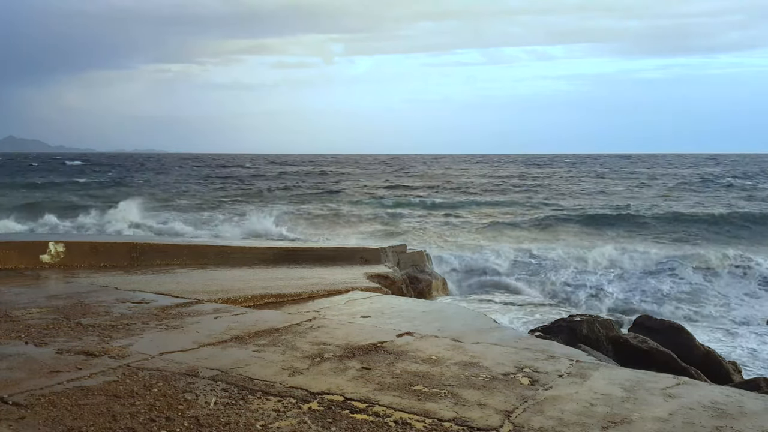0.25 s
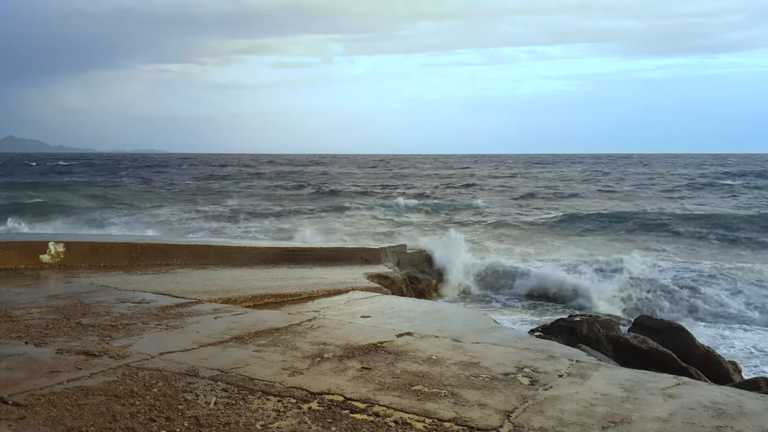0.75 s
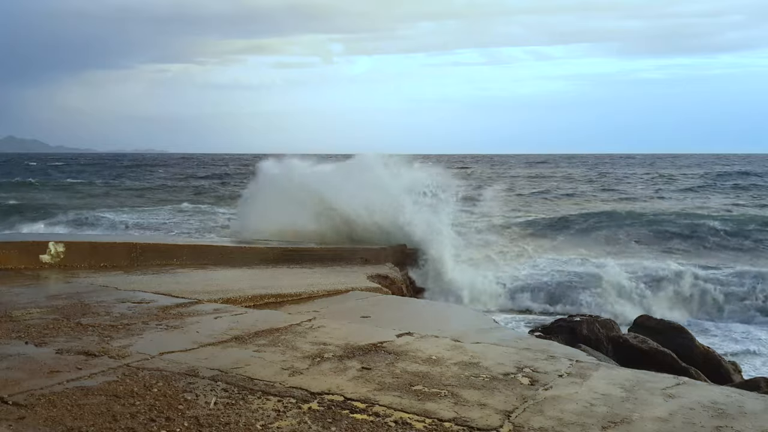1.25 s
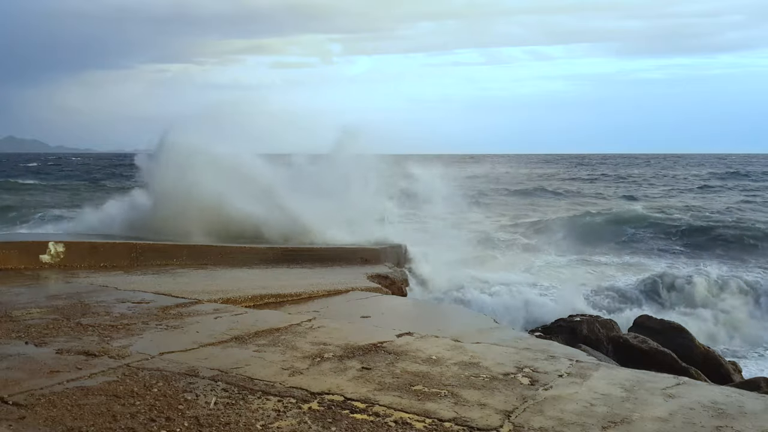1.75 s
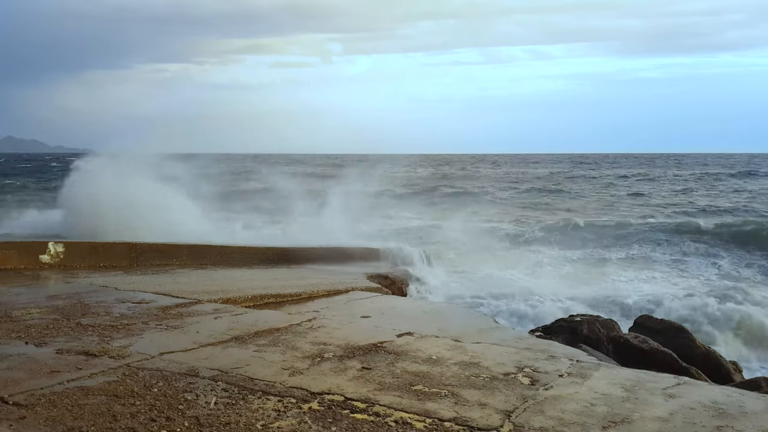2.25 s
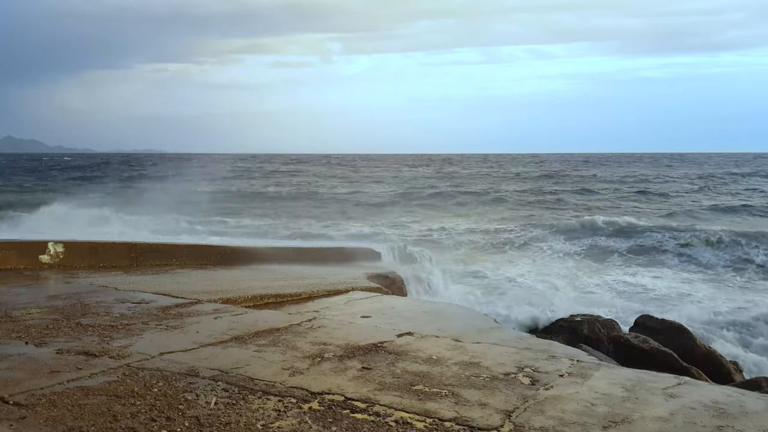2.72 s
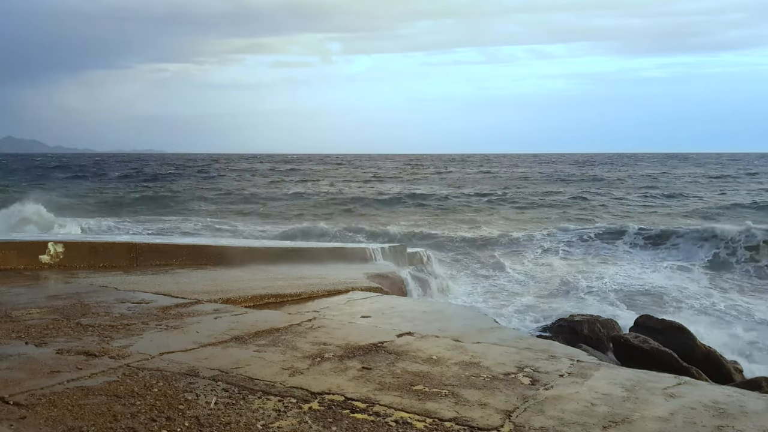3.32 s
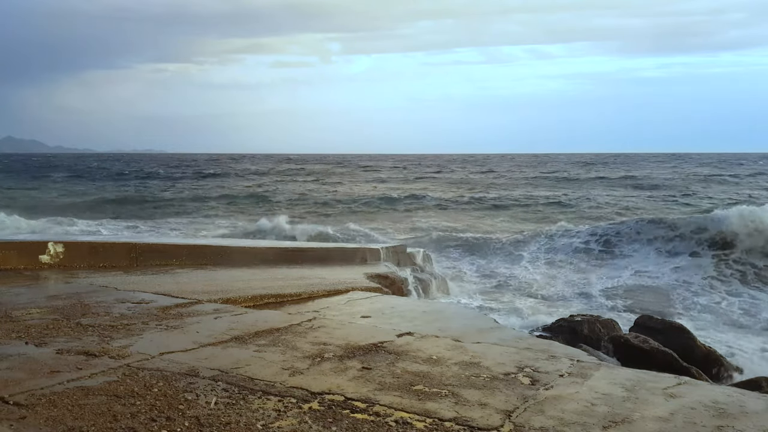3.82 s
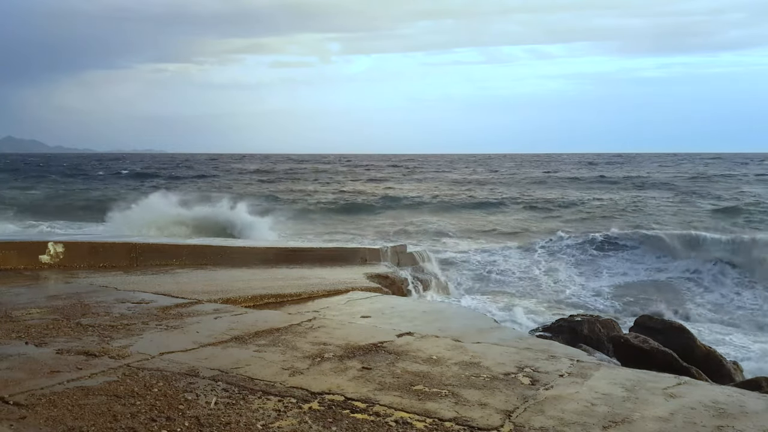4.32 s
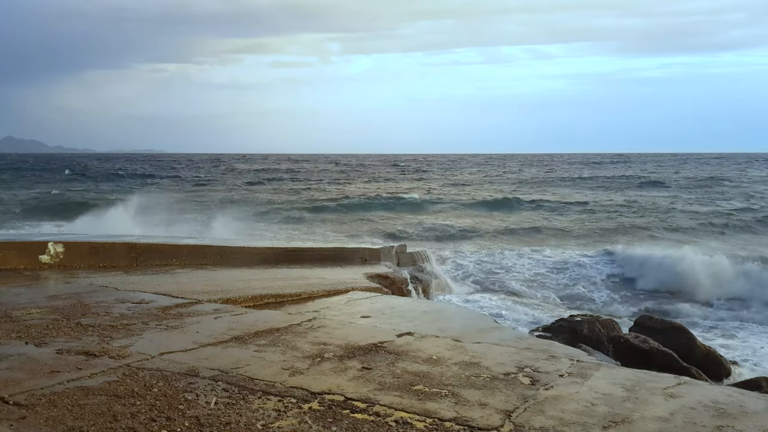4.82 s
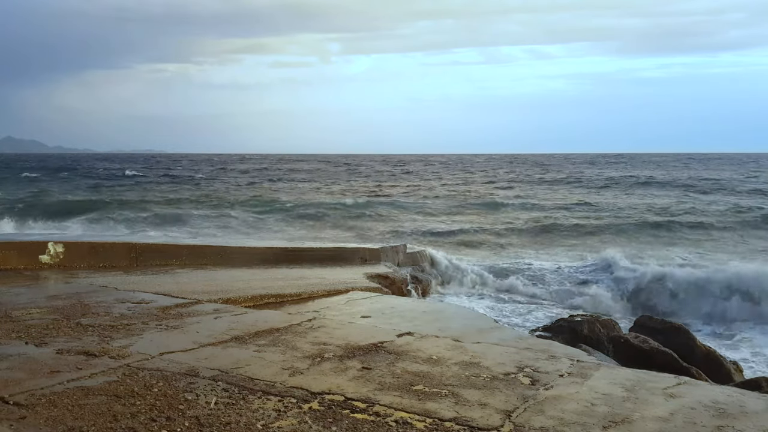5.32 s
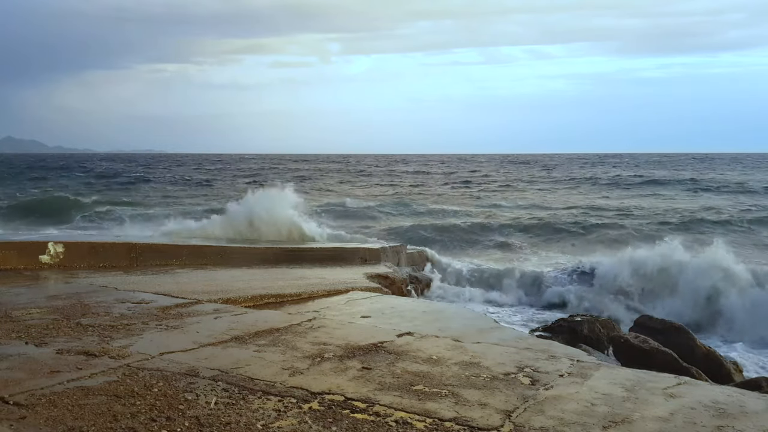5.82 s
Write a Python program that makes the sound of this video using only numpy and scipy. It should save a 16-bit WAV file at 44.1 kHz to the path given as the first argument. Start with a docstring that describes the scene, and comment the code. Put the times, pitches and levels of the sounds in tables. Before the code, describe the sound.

Rough waves break on a jetty and rocks with a wide foamy wash, two big surges, and a crackling gust of wind midway.

```python
"""A rocky coast with a jetty in storm surf, heard through two spaced microphone ports.
Waves roar on the rocks to the right, burst on the jetty ahead and fall back as spray: shaped noise plus
ringing bubbles, one band per pocket or droplet size. Gusts flutter as lumpy noise unrelated at the two ports,
pop as short pressure jolts on one port, and thud as slower ones on both; one pair of jolts is only faint chance
flecks of noise. The camera's steep wind filter leaves only their upper part; the spectra already carry it."""
import sys
import numpy as np
from scipy import signal
from scipy.fft import rfft, irfft, next_fast_len
from scipy.io import wavfile
from scipy.ndimage import uniform_filter1d, map_coordinates

SR = 44100
rng = np.random.default_rng(int(sys.argv[2]) if len(sys.argv) > 2 else 0)


def int16_out(signal):
    """Quantize to a 16-bit WAV file."""
    q = np.round(np.clip(np.atleast_2d(signal).T, -1, 1) * 32767)
    wavfile.write(sys.argv[1], SR, q.astype(np.int16))


N = 267246

# Surf strength: time_s, foam_db, then relative to foam: spray_db, crash_db, roar_db
SURF_LEVELS = [(0, -50, -12, 2.5, 3.5), (.46, -51, -14.5, 1, 3.5), (.6, -48.5, -11.5, 3.5, 4.5),
               (.85, -44.5, -13.5, 0, 1), (1.07, -44, -11.5, 1.5, 4), (1.15, -42.5, -13, -2, 3),
               (1.4, -43, -12.5, 1, 0.5), (1.65, -41.5, -14.5, 0, 0.5), (1.72, -39.5, -13, 1, 1.5),
               (1.78, -37, -12, 2, 0), (1.87, -35.5, -13, 0, -0.5), (1.94, -36, -12, 1, -5.5),
               (2.05, -37, -13.5, -1, -3.5), (2.16, -35, -10.5, -2.5, -2), (2.3, -39, -9, -0.5, -5),
               (2.45, -39.5, -10.5, 1, 1), (2.62, -42.5, -9, -5, 0.5), (2.8, -45.5, -9.5, -1.5, 0.5),
               (3, -44.5, -10.5, -1.5, 2.5), (3.15, -47, -10, -1.5, 3), (3.62, -48, -13.5, -1, 3.5),
               (3.88, -43.5, -15.5, -0.5, 3), (4, -45, -14, -1, 3.5), (4.15, -42, -16.5, -3, 1.5),
               (4.3, -37.5, -16, -1.5, 2), (4.45, -39.5, -15, -0.5, 3), (4.6, -41, -18.5, -1.5, 3.5),
               (4.72, -41, -16, -1, 5.5), (4.85, -40, -14, -1, 5.5), (4.95, -38.5, -14.5, -1.5, 5.5),
               (5.05, -37.5, -13.5, -1, 4.5), (5.17, -37.5, -14, 1.5, 2.5), (5.25, -36, -15, -4.5, 3.5),
               (5.31, -39, -14.5, -1.5, 3.5), (5.42, -42, -12, -2, 2.5), (5.6, -41.5, -14, 0.5, 2.5),
               (5.8, -40.5, -13, -2.5, 2.5), (6.06, -36, -13.5, -1.5, 2)]
# Brief dips of roar, crash, foam and spray: time_s, depth_db
SURF_DIPS = [(2.68, 4), (3.05, 3), (5.62, 4)]
DIP_SIDE_S = 0.016  # to 1/e of the depth, each side
# Gain of the roar's deep part: time_s, gain_db
ROAR_DEEP_GAIN = [(0, -0.5), (.5, 3), (.9, -2.2), (1.3, 0.5), (1.65, 2), (1.85, 0), (2.1, 4.5), (2.7, 0.5),
                  (3.3, -1.5), (3.9, -0.5), (4.2, -1.7), (4.5, 2), (4.8, -2.5), (5.1, -4.5), (5.25, -0.8),
                  (5.6, -0.5), (6.06, -1.2)]
ROAR_DEEP_HZ = 875
# Water power arriving from the jetty instead of the rocks: time_s, share_0_to_1
JETTY_SHARE = [(0, .3), (.55, .3), (.7, .65), (1.3, .55), (1.6, .5), (2.2, .55), (2.6, .08), (6.06, .08)]
# Wave booming against the jetty wall: time_s, level_db
BOOM_LEVELS = [(0, -77), (.28, -61), (.35, -52), (.47, -61), (.55, -56.5), (.8, -66), (1.1, -57.5),
               (1.4, -56), (1.8, -54), (2.15, -51.5), (2.5, -51), (2.6, -66), (3, -69), (6.06, -59.5)]

# Relative water spectra, microphone colour included: pitch_hz, density_db_per_hz
ROAR_SPECTRUM = [(50, -80), (100, -53), (250, -35), (450, -21.5), (560, -10.5), (700, -0.5), (850, -4),
                 (1100, -0.5), (1400, -3.5), (1900, -11), (3000, -47)]
CRASH_SPECTRUM = [(300, -90), (800, -52), (1300, -7), (1600, 8.5), (1900, 4.5), (2250, 8.5), (2450, 2),
                  (2700, -1), (3400, -21.5)]
FOAM_SPECTRUM = [(500, -90), (1500, -43), (2500, -11), (3000, -6), (3600, -4.5), (4400, -4), (5200, -11.5),
                 (6500, -26), (8000, -32.5), (11000, -58)]
SPRAY_SPECTRUM = [(1500, -68), (4000, -9.5), (6500, 8), (8200, -3), (9500, 2.5), (10600, 4), (12500, -0.5),
                  (14500, -5), (15700, -16), (17000, -34)]
BOOM_SPECTRUM = [(60, -70), (150, -33), (240, -14.5), (370, -15), (480, 2.5), (580, 4), (800, -33)]
# Likeness of the two ports per source: pitch_hz, likeness_0_to_1
ROCKS_LIKENESS = [(300, .75), (600, .9), (1400, .85), (1900, .35), (2200, .4), (2600, .05), (3200, .45),
                  (4000, .25), (6000, .12)]
JETTY_LIKENESS = [(500, .95), (1000, .6), (1400, 0), (2100, .95), (2600, .1), (3400, .8), (4400, .5),
                  (5000, .1), (12000, .2)]
BOOM_LIKENESS = [(150, .4), (450, .95)]
# Port colour difference: pitch_hz, left_minus_right_db
PORT_COLOUR = [(500, 0.5), (1200, 1), (2000, 0), (4500, 0), (6200, -2.5), (8500, -0.5)]
ROCKS_LEFT_LAG_MS = 0.349
PORT_HALVES = np.array([[.5], [-.5]])  # splits a left-minus-right value between left and right

# Relative wind spectra, small eddies and slow ones: pitch_hz, density_db_per_hz
EDDY_SPECTRUM = [(60, -84), (200, -47), (400, -21.5), (660, -1.5), (900, -2.5), (1300, -5.5), (1800, -13.5),
                 (2800, -29), (5000, -51), (12000, -74)]
THUD_SPECTRUM = [(25, -58), (100, -26), (160, -20), (250, -11), (420, 0.5), (540, 1), (900, -42)]
# Gusts on the ports: start_s, hold_s, flutter_db, left_minus_right_db
GUST_EVENTS = [(0.32, 0.05, -48, 0), (.39, .09, -47, 2), (0.537, 0.048, -47.5, -4),
               (1.168, 0.034, -61, -10), (2.24, 0.015, -40, -8), (2.277, 0.028, -37, -6),
               (2.354, 0.047, -37.5, 12), (2.408, 0.034, -37.5, 8), (2.472, .015, -33, 2),
               (2.502, 0.015, -37, 5), (2.532, .008, -38, 5), (2.555, .01, -40, 0),
               (3.445, 0.018, -47.5, 0), (5.485, 0.033, -48, -5), (5.582, 0.017, -49, -14),
               (5.688, 0.031, -43, 6), (5.958, .11, -56, 13)]
GUST_ATTACK_S, GUST_RELEASE_S = .006, .016  # to 1/e
BREEZE_DB, BREEZE_SWING_DB = -53.5, 2.5
GUST_BUFFET_DB = -19  # relative to the gust's flutter
BREEZE_BUFFET_DB = -63

# Short jolts: wind pops, except the pair at 5.4431 and 5.4433 s: faint chance flecks of noise on both ports.
# time_s, port (-1 left, 1 right), peak_db before JOLT_TRIM_DB, nominal length_ms, pitch_hz,
# edge_db (treble over body, nominal)
JOLT_EVENTS = [(0.3029, -1, -30.5, 1.4, 1210, -6), (0.3084, -1, -30.0, 2.8, 1280, -7),
               (0.312, -1, -31.5, 3.4, 870, -22), (0.316, -1, -30.0, 3.1, 890, -6),
               (0.3198, -1, -34.5, 1.9, 1150, -22), (0.3282, -1, -32.0, 3.3, 930, -10),
               (0.3377, -1, -19.0, 3.1, 820, -17), (0.3467, 1, -30.0, 2.1, 790, -22),
               (0.3621, 1, -32.5, 3.4, 760, -22), (0.3656, 1, -32.5, 2.5, 1020, -22),
               (0.3732, 1, -34.0, 2.6, 770, -22), (0.3838, -1, -32.5, 2.5, 690, -22),
               (0.4009, 1, -29.5, 3.0, 740, -22), (0.4023, -1, -24.0, 2.4, 810, -22),
               (0.4074, 1, -33.0, 3.2, 770, -22), (0.408, -1, -33.0, 3.9, 860, -7),
               (0.4136, -1, -29.0, 2.9, 780, -22), (0.4186, -1, -31.0, 1.7, 1050, -22),
               (0.4393, -1, -30.5, 2.7, 780, -22), (0.4454, 1, -28.0, 3.1, 760, -22),
               (0.462, -1, -29.0, 1.7, 940, -16), (0.5618, 1, -29.5, 3.0, 810, -12),
               (0.597, 1, -29.0, 2.4, 1000, -22), (2.2309, -1, -14.5, 1.6, 950, -8),
               (2.2444, -1, -15.0, 4.0, 1040, -13), (2.2459, 1, -12.0, 2.7, 960, -14),
               (2.2519, -1, -15.5, 3.0, 1030, -22), (2.2576, -1, -20.0, 1.8, 990, -22),
               (2.2759, -1, -19.0, 4.5, 840, -22), (2.2869, -1, -20.0, 1.7, 1370, -6),
               (2.2962, -1, -16.5, 2.1, 960, -22), (2.3448, 1, -20.0, 4.0, 840, -22),
               (2.3488, 1, -19.0, 5.1, 690, -12), (2.3514, -1, -21.5, 3.0, 740, -22),
               (2.3527, 1, -18.5, 4.2, 900, -22), (2.3576, 1, -8.5, 2.4, 910, -18),
               (2.3585, -1, -14.5, 5.3, 890, -22), (2.3634, -1, -12.0, 2.1, 880, -22),
               (2.364, 1, -13.0, 2.0, 1010, -22), (2.3689, 1, -16.5, 2.4, 1200, -13),
               (2.3705, -1, -8.5, 1.7, 1050, -13), (2.3768, 1, -21.5, 1.6, 1110, -15),
               (2.3801, -1, -18.5, 1.7, 1070, -13), (2.383, 1, -21.0, 4.0, 870, -22),
               (2.402, 1, -14.5, 3.5, 840, -15), (2.403, -1, -15.5, 3.2, 870, -22),
               (2.4054, 1, -15.5, 2.1, 860, -22), (2.4089, 1, -19.0, 2.9, 800, -22),
               (2.417, 1, -16.0, 3.3, 960, -22), (2.4177, -1, -20.0, 4.9, 990, -22),
               (2.4238, 1, -24.5, 4.3, 1000, -22), (2.4293, 1, -20.5, 2.0, 890, -22),
               (2.4317, -1, -22.0, 4.2, 840, -22), (2.4335, 1, -14.0, 3.6, 920, -12),
               (2.4488, -1, -16.5, 1.7, 980, -12), (2.4502, 1, -24.5, 1.7, 1180, -9),
               (2.4542, 1, -21.0, 2.2, 1110, -6), (2.4636, 1, -22.5, 1.8, 1110, -22),
               (2.4717, 1, -15.0, 4.6, 910, -13), (2.4735, -1, -13.5, 2.7, 890, -19),
               (2.4765, 1, -21.5, 5.8, 880, -13), (2.4806, -1, -16.5, 4.2, 920, -8),
               (2.4819, 1, -18.0, 2.0, 1180, -12), (2.4944, 1, -21.5, 1.8, 910, -10),
               (2.4994, -1, -13.0, 3.4, 860, -9), (2.4995, 1, -13.0, 3.9, 780, -13),
               (2.5033, -1, -16.5, 3.1, 820, -22), (2.5035, 1, -17.0, 2.5, 870, -20),
               (2.5074, -1, -15.5, 2.0, 840, -22), (2.5106, 1, -14.0, 2.3, 920, -20),
               (2.5115, -1, -21.0, 1.8, 920, -22), (2.5169, 1, -22.5, 4.0, 1000, -22),
               (2.5181, -1, -22.0, 2.7, 1030, -14), (2.5297, 1, -14.0, 3.0, 1020, -20),
               (2.5307, -1, -14.5, 3.8, 780, -21), (2.5335, 1, -11.5, 2.0, 870, -14),
               (2.5359, -1, -15.5, 2.2, 1030, -18), (2.5379, 1, -14.5, 2.5, 1000, -13),
               (2.5416, 1, -22.0, 4.2, 860, -22), (2.5457, 1, -23.0, 4.3, 740, -22),
               (2.5541, 1, -23.5, 2.9, 730, -13), (2.5591, -1, -21.0, 1.9, 970, -12),
               (3.4599, -1, -20.0, 1.7, 970, -7), (3.4669, -1, -23.0, 1.6, 970, -7),
               (3.4781, -1, -25.5, 2.2, 1090, -7), (4.5839, 1, -23.5, 1.9, 880, -22),
               (4.5892, 1, -27.0, 3.1, 930, -22), (5.3708, 1, -28.0, 1.8, 960, -22),
               (5.4431, 1, -26.5, 2.2, 1390, -22), (5.4433, -1, -27.0, 2.1, 1300, -15),
               (5.4828, -1, -26.5, 1.8, 1160, -9), (5.4895, -1, -26.5, 1.8, 940, -8),
               (5.5116, -1, -22.0, 1.8, 1020, -8), (5.5937, -1, -26.0, 3.4, 920, -20),
               (5.8876, -1, -26.0, 2.1, 1000, -22), (5.9029, -1, -26.5, 5.3, 1140, -22)]
JOLT_TRIM_DB = -0.1
PLAIN_EDGE_DB = -15  # this edge leaves the eddy spectrum untilted
SINGLE_STEP_MS = 2.0  # up to here a jolt is one step with no wake
FOCUS_DB, FOCUS_OCTAVES = 7, .3  # boost at the jolt's own pitch
FOCUSED_MS = 3  # shorter jolts are broader clicks
SUDDENNESS = .55  # 1: only rings out; 0: swells as long as it fades
WAKE_DB, WAKE_S = -12, .004
LEAK_DB, LEAK_HZ = -10, 800  # through the body to the far port

# Single slow eddies: time_s, level_db
THUD_EVENTS = [(.324, -46), (.385, -46), (.44, -52), (.67, -55), (1.082, -47), (1.179, -46), (2.071, -44),
               (2.16, -53), (2.231, -41), (2.279, -44), (2.511, -39), (4.59, -58), (4.831, -50),
               (5.033, -38), (5.385, -48), (5.889, -54)]
THUD_S = .0012  # to 1/e, each side, before colouring

TOP_HZ, BASS_CUT_HZ = 15730, 90


def amp(db):
    """Decibels to amplitude."""
    return 10 ** (np.asarray(db) / 20)


def unit(x):
    """Scale to RMS 1."""
    return x / np.sqrt(np.mean(x ** 2) + 1e-20)


def along(points, hz):
    """Interpolate (pitch_hz, value) points on a log frequency axis."""
    point_hz, value = np.transpose(points)
    return np.interp(np.log(hz + 1), np.log(point_hz + 1), value)


def curves(rows):
    """One value per sample for each column after the time."""
    time_s, *columns = np.transpose(rows)
    t = np.arange(N) / SR
    return [np.interp(t, time_s, column) for column in columns]


def wobble(rate_hz):
    """Smooth random curve with rate_hz knots a second."""
    knots = rng.standard_normal(int(N * rate_hz / SR) + 4)
    return map_coordinates(knots, [np.arange(N) * rate_hz / SR])


def filtered(x, response):
    """Multiply the spectrum of x by a response of frequency, real or complex."""
    size = next_fast_len(N + SR // 2)
    spectrum = rfft(x, size) * response(np.fft.rfftfreq(size, 1 / SR))
    return irfft(spectrum, size)[..., :N]


def swell(start_s, hold_s, attack_s, release_s):
    """Envelope 0 to 1: bell-shaped rise to start_s, hold, bell-shaped fall."""
    t = np.arange(N) / SR - start_s
    rise = (t.clip(None, 0) / attack_s) ** 2
    fall = ((t - hold_s).clip(0) / release_s) ** 2
    return np.exp(-rise - fall)


def bubbles(count, cycles, spread_db):
    """Bubbles ring briefly at a rising pitch; small ones are as many per octave as big ones."""
    when, pitch, size = rng.random((count, 3)).T
    hz = 500 * 14 ** pitch[:, None]
    t = np.arange(900) / SR
    age = t * hz / cycles
    tone = np.sin(2 * np.pi * hz * t * (1 + 0.0565 * age))
    ring = tone * age * np.exp(-2.5 * age) * hz / 1000
    ring *= amp(-spread_db * np.log(size + 0.00091))[:, None]
    at = (when * N).astype(int)[:, None] + np.arange(len(t))
    return unit(np.bincount(at.ravel(), ring.ravel(), N + len(t))[:N])


def churn(patchy_db, grain_db, bubbly):
    """Bursting foam as two noises: patches in time and pitch, fast grain, near bubbles in the first."""
    bins = signal.stft(rng.standard_normal((2, N)), nperseg=512)[2]
    patches = uniform_filter1d(rng.standard_normal(bins.shape[1:]), size=2, axis=0)
    patches = uniform_filter1d(patches, size=6, axis=1)
    pair = signal.istft(bins * amp(patchy_db * unit(patches)), nperseg=512)[1][:, :N]
    if bubbly:
        pair[0] += bubbly * bubbles(count=2200, cycles=15.06, spread_db=2.0)
    return pair * amp(grain_db * wobble(150))


def placed(pair, spectrum, likeness, left_lag_ms):
    """Wide source: a mid-side mix sets the port likeness, a delay and a tilt set the side."""
    def mid_side(hz):
        angle = np.arccos(along(likeness, hz)) / 2
        return amp(along(spectrum, hz)) * [np.cos(angle), np.sin(angle)]

    def ports(hz):
        delay = np.exp(-2j * np.pi * hz * PORT_HALVES * left_lag_ms / 1000)
        return amp(PORT_HALVES * along(PORT_COLOUR, hz)) * delay

    mid, side = filtered(pair, mid_side)
    return unit(filtered(np.array([mid + side, mid - side]), ports))


def water(level_db, spectrum, patchy_db, grain_db, surge_db, bubbly):
    """One size of bubbles, bursting independently at the rocks and the jetty."""
    ahead = curves(JETTY_SHARE)[0]
    rocks = placed(churn(patchy_db, grain_db, bubbly), spectrum, ROCKS_LIKENESS, ROCKS_LEFT_LAG_MS)
    jetty = placed(churn(patchy_db, grain_db, bubbly), spectrum, JETTY_LIKENESS, 0)
    level = amp(level_db + surge_db * wobble(12))
    return level * (np.sqrt(1 - ahead) * rocks + np.sqrt(ahead) * jetty)


def surf():
    """Big air pockets roar, falling water crashes, foam hisses, spray fizzes, the jetty wall booms."""
    foam_db, spray_over_db, crash_over_db, roar_over_db = curves(SURF_LEVELS)
    dips_db = sum(depth_db * swell(s, 0, DIP_SIDE_S, DIP_SIDE_S) for s, depth_db in SURF_DIPS)
    foam_db = foam_db - dips_db
    roar = water(foam_db + roar_over_db, ROAR_SPECTRUM,
                 patchy_db=2.5, grain_db=1.75, surge_db=0.25, bubbly=0.27)
    deep = filtered(roar, lambda hz: 1 / (1 + (hz / ROAR_DEEP_HZ) ** 8))
    roar = roar + (amp(curves(ROAR_DEEP_GAIN)[0]) - 1) * deep
    crash = water(foam_db + crash_over_db, CRASH_SPECTRUM,
                  patchy_db=3.0, grain_db=1.0, surge_db=0.6, bubbly=0.4)
    foam = water(foam_db, FOAM_SPECTRUM,
                 patchy_db=3.0, grain_db=0.85, surge_db=0.25, bubbly=0.22)
    spray = water(foam_db + spray_over_db, SPRAY_SPECTRUM,
                  patchy_db=2.7, grain_db=1.0, surge_db=.9, bubbly=0)
    boom_noise = churn(patchy_db=2.2, grain_db=1.1, bubbly=0)
    boom = amp(curves(BOOM_LEVELS)[0]) * placed(boom_noise, BOOM_SPECTRUM, BOOM_LIKENESS, 0)
    return roar + crash + foam + spray + boom


def eddies(spectrum, lumpy_db, swell_db):
    """Turbulent pressure in uneven lumps, unrelated at the two ports."""
    fast = np.array([wobble(90), wobble(90)])
    slow = np.array([wobble(18), wobble(15)])
    noise = filtered(rng.standard_normal((2, N)), lambda hz: amp(along(spectrum, hz)))
    return unit(amp(lumpy_db * fast + swell_db * slow) * noise)


def flutter():
    """Small eddies brush the ports; slow ones buffet faintly through the wind filter."""
    gust = np.zeros((2, N))
    for start_s, hold_s, level_db, lean_db in GUST_EVENTS:
        envelope = swell(start_s, hold_s, GUST_ATTACK_S, GUST_RELEASE_S)
        gust += amp(level_db + PORT_HALVES * lean_db) * envelope
    breeze = amp(BREEZE_DB + BREEZE_SWING_DB * wobble(3.14))
    brush = (gust + breeze) * eddies(EDDY_SPECTRUM, lumpy_db=2.0, swell_db=3.0)
    buffet = amp(GUST_BUFFET_DB) * gust.mean(axis=0) + amp(BREEZE_BUFFET_DB + 0.85 * wobble(3.8))
    return brush + buffet * eddies(THUD_SPECTRUM, lumpy_db=3, swell_db=5)


def jolt(noise, lasting_s, gain_db):
    """Short coloured push of noise; its smoothed envelope peaks at 1 in the middle."""
    middle = len(noise) // 2
    t = (np.arange(len(noise)) - middle) / SR
    # Folded cepstrum: gives the colour its minimum phase
    cepstrum = irfft(gain_db * np.log(10) / 20)
    cepstrum[1:middle] *= 2
    cepstrum[middle + 1:] = 0
    colour = rfft(cepstrum)
    burst = noise * np.exp(-(t / lasting_s) ** 2)
    push = irfft(rfft(burst) * np.exp(colour.real + 1j * SUDDENNESS * colour.imag))
    power = uniform_filter1d(np.abs(signal.hilbert(push)) ** 2, size=50)
    return np.roll(push, middle - power.argmax()) / np.sqrt(power.max())


def pops_and_flecks():
    """Wind pops: a strong eddy jolts one port in one or more steps, a weak wake behind; flecks likewise."""
    out = np.zeros((2, N))
    size = 2048
    hz = np.fft.rfftfreq(size, 1 / SR)
    eddy_db = along(EDDY_SPECTRUM, hz)
    noises = rng.standard_normal((len(JOLT_EVENTS), 2, size))
    for (s, port, peak_db, length_ms, pitch_hz, edge_db), noise in zip(np.array(JOLT_EVENTS), noises):
        tilt_db = (edge_db - PLAIN_EDGE_DB) * np.log2((hz + 1) / 1100).clip(0, 1)
        octaves_off = np.log2((hz + 1) / pitch_hz)
        focus = min(length_ms / FOCUSED_MS, 1) ** 2
        focus_db = FOCUS_DB * focus * np.exp(-(octaves_off / FOCUS_OCTAVES) ** 2)
        lasting_s = 3e-5 + max(length_ms - SINGLE_STEP_MS, 0) / 1100
        push = jolt(noise[0], lasting_s, eddy_db + tilt_db + focus_db)
        wake = np.roll(jolt(noise[1], WAKE_S, eddy_db), round(WAKE_S * SR / 2))
        wake = wake * np.clip(length_ms - SINGLE_STEP_MS, 0, 1)
        start = round(s * SR) - size // 2
        out[int(port > 0), start:start + size] += amp(peak_db + JOLT_TRIM_DB) * (push + amp(WAKE_DB) * wake)
    leak = filtered(out[::-1], lambda hz: 1 / (1 + 1j * hz / LEAK_HZ))
    return out + amp(LEAK_DB) * leak


def thuds():
    """Single slow eddies push on both ports, with unrelated noise at each."""
    out = np.zeros((2, N))
    size = 4096
    colour_db = along(THUD_SPECTRUM, np.fft.rfftfreq(size, 1 / SR))
    noises = rng.standard_normal((len(THUD_EVENTS), 2, size))
    for (s, level_db), noise in zip(THUD_EVENTS, noises):
        start = round(s * SR) - size // 2
        for port in range(2):
            out[port, start:start + size] += amp(level_db) * jolt(noise[port], THUD_S, colour_db)
    return out


def scene():
    """Sum of surf, wind and flecks."""
    return surf() + flutter() + pops_and_flecks() + thuds()


def record(dry):
    """The camera rolls off deep bass and keeps nothing above its band limit."""
    return filtered(dry, lambda hz: (hz < TOP_HZ) / (1 + (BASS_CUT_HZ / (hz + 1)) ** 2))


dry = scene()
out = record(dry)
int16_out(out)
```